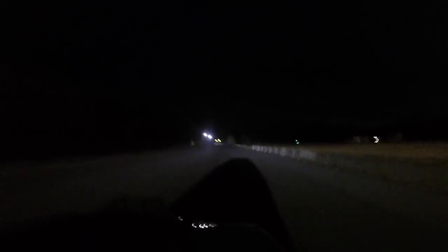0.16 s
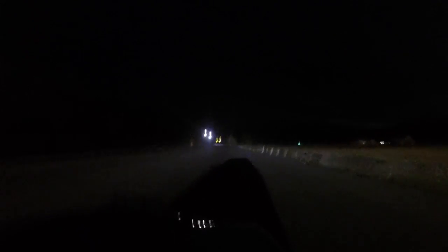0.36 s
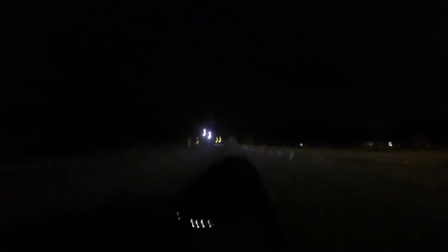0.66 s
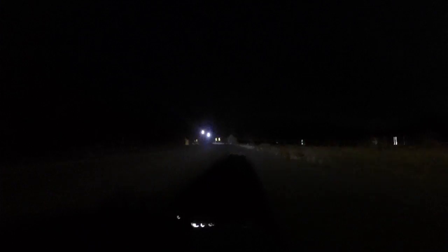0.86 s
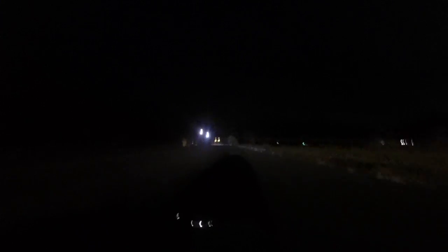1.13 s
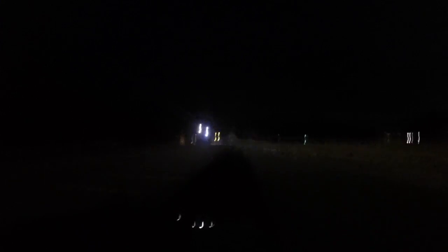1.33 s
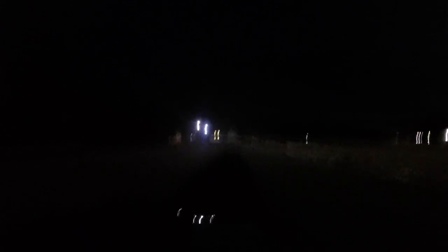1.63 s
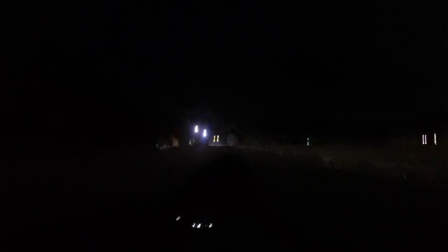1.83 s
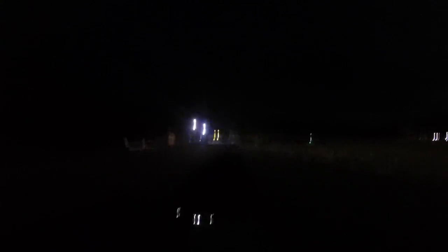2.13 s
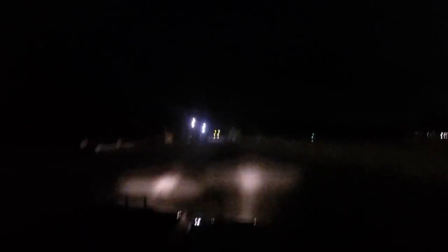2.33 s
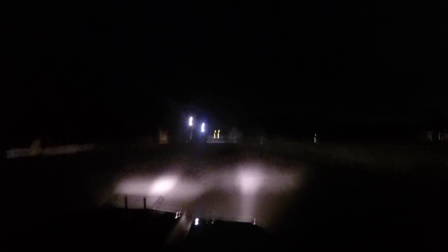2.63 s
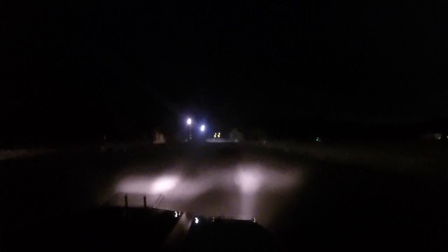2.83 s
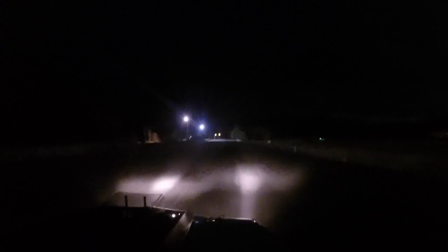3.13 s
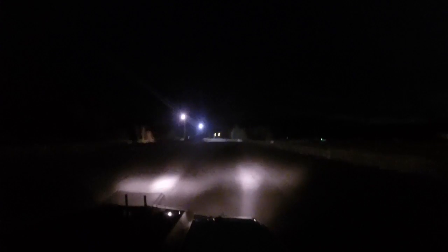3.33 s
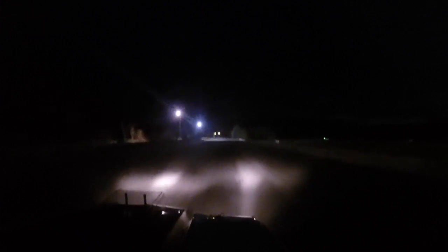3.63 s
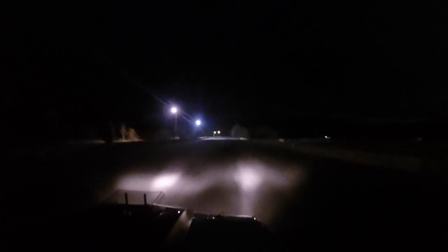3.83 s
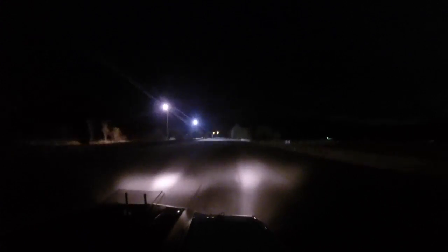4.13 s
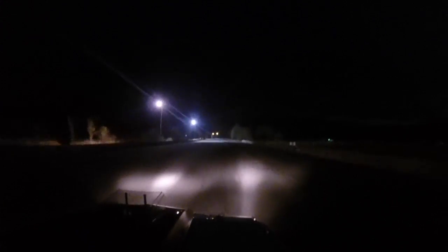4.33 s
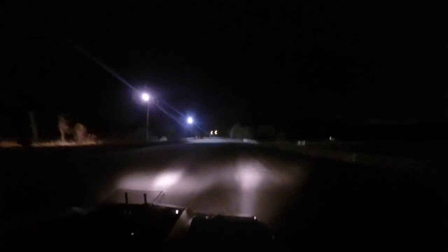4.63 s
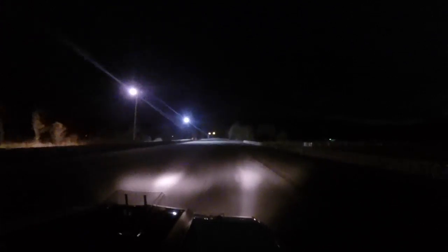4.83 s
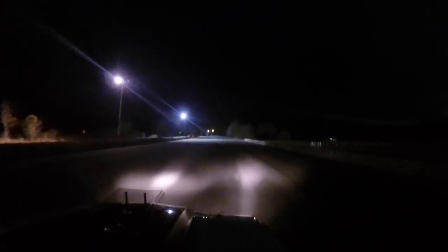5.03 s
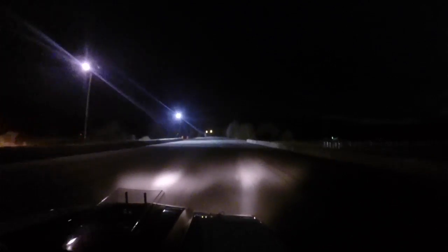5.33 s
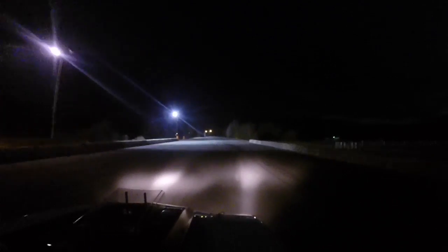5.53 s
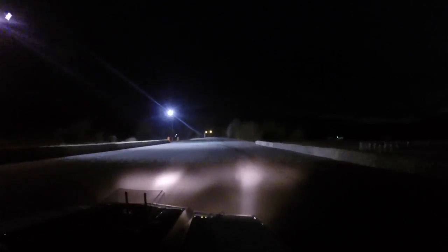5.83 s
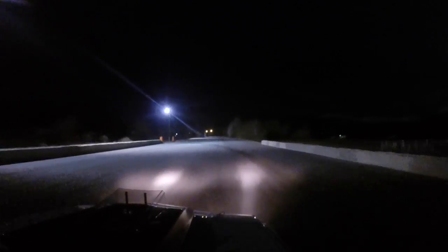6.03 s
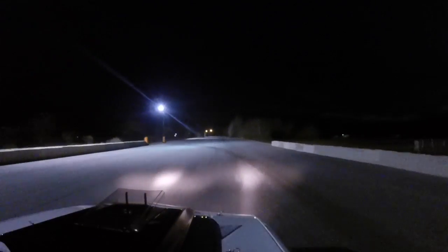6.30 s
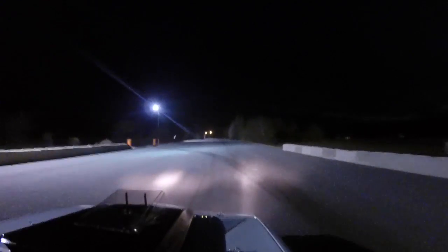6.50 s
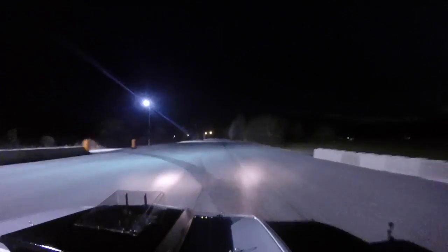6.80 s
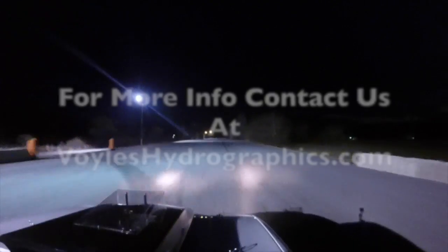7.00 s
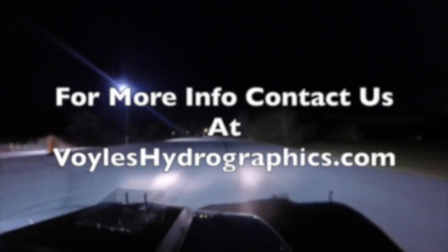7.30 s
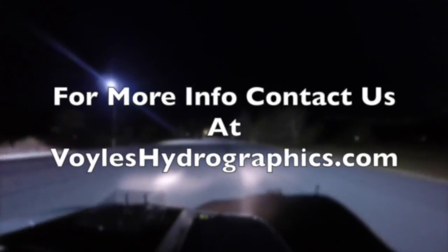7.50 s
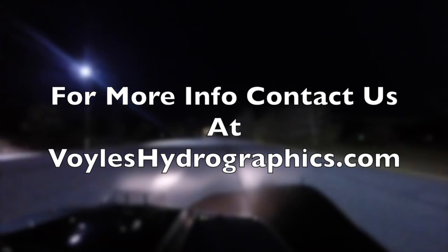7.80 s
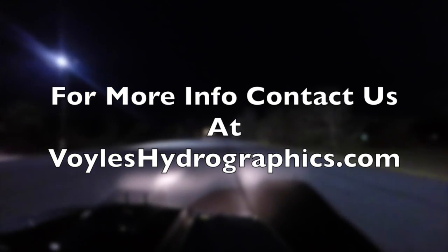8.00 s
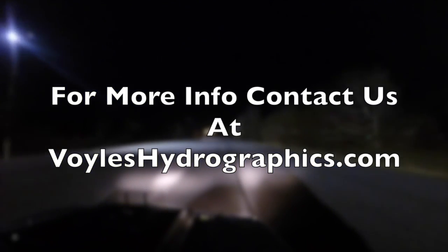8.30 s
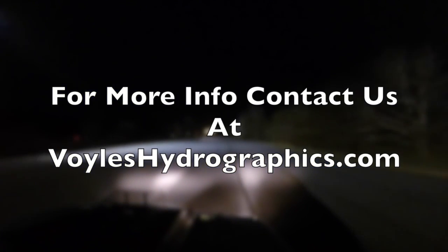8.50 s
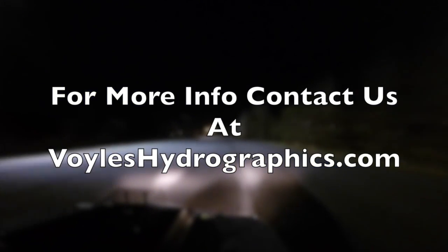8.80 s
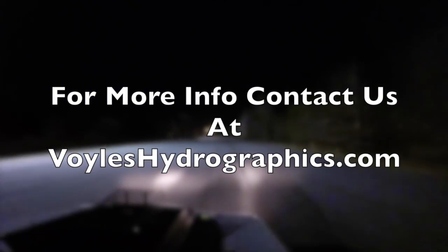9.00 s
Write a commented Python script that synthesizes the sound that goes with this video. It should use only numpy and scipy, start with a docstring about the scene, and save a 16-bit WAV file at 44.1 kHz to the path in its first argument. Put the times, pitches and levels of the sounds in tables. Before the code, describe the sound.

Bright, gritty wind noise pours over an onboard microphone while a race car slows on a track. The hiss thins out, leaving a duller rush and a stronger, wavering low boom from road and exhaust. Tyre tones slide downward through a ringing panel. A sharp stone tick lands early; short bass thuds cluster in the last two seconds, briefly squashing the sound.

```python
"""A booming roar and a bright rush of air: a drag car coasts down the track after its run.
We listen from a camera riding on the car. The engine lopes near idle and booms in the body,
and the tyres drum at multiples of the falling wheel speed.
Air is filtered noise shaped by the camera housing, grit ticks on it and a faint whistle sits on top.
Bumps add short deep swings, and the camera's compressor turns loud bass peaks down."""
import sys
import numpy as np
from scipy import signal
from scipy.fft import rfft, irfft, next_fast_len
from scipy.io import wavfile
from scipy.ndimage import uniform_filter1d

SR = 44100
rng = np.random.default_rng(int(sys.argv[2]) if len(sys.argv) > 2 else 0)


def unload_wav(signal):
    """Save mono or channel-first audio to the path in sys.argv[1] as 16-bit WAV at rate SR, clipped to [-1, 1]."""
    wavfile.write(
        sys.argv[1],
        SR,
        np.round(np.clip(np.atleast_2d(signal).T, -1, 1) * 32767).astype(np.int16),
    )


N = 403503
TIME = np.arange(N) / SR  # seconds
FREQS = np.fft.rfftfreq(N, 1 / SR)  # Hz

# how fast the wheels turn as the car slows: (time_s, turns_per_s)
WHEEL_SPEED = [(0, 21.3), (1, 19.46), (2, 17.62), (3, 16.13), (4, 14.74), (5, 13.58), (6, 12.6), (7, 11.68),
               (8, 10.96), (9.15, 10.15)]


def gain_of(db):
    """Turns decibels into an amplitude."""
    return 10 ** (np.asarray(db) / 20)


def evened(x):
    """Scales a sound to an average (rms) level of 1."""
    return x / np.sqrt(np.mean(x ** 2) + 1e-20)


def steadied(x, size):
    """Keeps the level near 1 all along, judged over stretches of about `size` samples."""
    power = uniform_filter1d(uniform_filter1d(x ** 2, size), size)
    return x / np.sqrt(abs(power) + 1e-12)


def curves(rows):
    """Joins the rows of a table by straight lines into one curve over time for each column."""
    times_s, *columns = np.transpose(rows)
    return [np.interp(TIME, times_s, column) for column in columns]


def read(points, hz):
    """Reads the gain at any pitch from (pitch_hz, level_db) points, on a log pitch scale."""
    point_hz, point_db = np.transpose(points)
    return gain_of(np.interp(np.log(hz + 1), np.log(point_hz + 1), point_db))


def coloured(x, gain):
    """Filters a sound, with one gain for each frequency in FREQS."""
    size = next_fast_len(N)
    size_gain = np.interp(np.fft.rfftfreq(size, 1 / SR), FREQS, gain)
    return irfft(rfft(x, size) * size_gain, size)[:N]


def wander(per_s):
    """Makes a random curve of rms 1 that picks a new value `per_s` times a second."""
    knots = rng.standard_normal(8192)
    return evened(np.interp(TIME * per_s, np.arange(len(knots)), knots))


def hump(s, length):
    """Rises and falls smoothly to height 1 at time s; about a third is left half a length away."""
    return np.exp(-(2 * (TIME - s) / length) ** 2)


def partial(turns, rough, waver_per_s):
    """Makes one tone that wavers at random in phase and strength."""
    angle = 2 * np.pi * (turns + rng.random())
    tone = np.cos(angle + rough * wander(waver_per_s))
    return tone * (1 + rough * wander(waver_per_s))


def body():
    """Road and exhaust shake the body, which answers with a deep boom, a drone and a ringing panel."""
    # what the body passes into the deep boom: (pitch_hz, level_db)
    boom_shape = [(8, -45), (14, -18), (19, -12), (28, -19), (41, -4.5), (53, -8.5), (63, 4.5), (72, 2.5),
                  (82, -6), (92, -8.5), (105, -14), (125, -18.5), (170, -34.5), (260, -52.5)]
    # what it passes into the drone above: (pitch_hz, level_db)
    drone_shape = [(105, -25), (135, -16), (155, -2.5), (175, -5), (188, -8), (208, -3), (235, -5),
                   (278, 2), (315, -5.5), (350, -24.5), (440, -51)]
    # a panel that rings above the drone: (pitch_hz, level_db)
    panel_shape = [(260, -41), (320, -10), (350, 3), (385, -2.5), (405, -6.5), (428, -4.5), (450, -21.5),
                   (475, -31), (560, -55)]
    # level of the panel, which swells as tread tones glide through it: (time_s, level_db)
    panel_levels = [(0, -37.5), (.18, -43), (.35, -32.5), (.8, -43), (1.2, -41.5), (2.9, -29), (3.6, -33.5),
                    (4.25, -28), (4.95, -34.5), (5.9, -27), (6.35, -30.5), (6.8, -36.5), (7.35, -27.5),
                    (7.85, -33), (9.15, -29.5)]
    # smoother stretches where the boom sinks: (middle_s, length_s, drop_db)
    lulls = [(.6, 0.11, 3), (.92, 0.35, 3.5), (8.83, 0.26, 6)]

    road = tyres()
    road_boom = gain_of(-19.0) * evened(coloured(road, read(boom_shape, FREQS)))
    boom = road_boom + exhaust()
    drone = coloured(road, read(drone_shape, FREQS))
    panel = coloured(road, read(panel_shape, FREQS))

    # the boom grows steadily as the car rolls on, and throbs at random
    throb_db = 1.53 * uniform_filter1d(wander(24), size=1500)
    lull_db = sum(drop_db * hump(s, length) for s, length, drop_db in lulls)
    start_db, growth_db_per_s = -19.5, 0.76
    boom_db = start_db + growth_db_per_s * TIME - lull_db + throb_db

    # the drone is loudest midway and falls off to either side
    top_db, top_s, fall_db_per_s = -29, 4.3, 1.1
    drone_db = top_db - fall_db_per_s * abs(TIME - top_s)
    panel_db = curves(panel_levels)[0]
    return (gain_of(boom_db) * steadied(boom, size=5000)
            + gain_of(drone_db) * steadied(drone, size=16000)
            + gain_of(panel_db) * steadied(panel, size=16000))


def exhaust():
    """Uneven cylinder firings give low tones close in pitch, which beat together into a lope."""
    # engine speed, and exhaust level as it joins the road boom: (time_s, camshaft_turns_per_s, level_db)
    engine = [(0, 8.9, -20.5), (.5, 10.7, -22), (1.2, 9.7, -28), (2, 10.2, -24), (2.8, 11.1, -24.5),
              (3.8, 11.3, -16.5), (5, 11.25, -14.5), (6.2, 11.74, -16.5), (7.2, 11.3, -11),
              (8.2, 10.9, -18), (8.55, 10.34, -7), (9.15, 11.3, -12)]
    # eight firings a camshaft turn, uneven between cylinders: (multiple_of_turns, level_db)
    firing_tones = [(4, -17), (6, -3), (7, 2.5), (8, -0.5), (11, -16.5), (12, -19), (13, -22.5),
                    (25, -15.5), (27, -19)]

    cam_hz, level_db = curves(engine)
    unsteady_hz = cam_hz * (1 + 0.0069 * wander(5))
    turns = np.cumsum(unsteady_hz) / SR
    lope = sum(gain_of(db) * partial(round(multiple) * turns, rough=0.39, waver_per_s=9)
               for multiple, db in firing_tones)
    return gain_of(level_db) * evened(lope)


def tyres():
    """The tread repeats with every wheel turn, giving tones at its multiples; rough track adds noise."""
    # strongest tones, from unbalance and uneven tread: (multiple_of_turns, level_db)
    strong_tones = [(1, 15.5), (2, 2), (3, 3), (4, 4.5), (10, 12), (15, 8.5), (16, 8), (17, 6.5), (19, 6),
                    (20, 8.5), (21, 8), (22, 11), (24, 7), (26, 10.5), (28, 12), (29, 5), (30, 14),
                    (31, 11), (34, 9.5), (36, 11)]

    turns = np.cumsum(curves(WHEEL_SPEED)[0]) / SR
    strong = {round(multiple): db for multiple, db in strong_tones}
    # multiples missing from the table play at -6 dB
    tread = sum(gain_of(strong.get(k, -6)) * partial(k * turns, rough=.16, waver_per_s=3)
                for k in range(1, 39))
    track = evened(coloured(rng.standard_normal(N), FREQS < 1000))
    return evened(tread) + gain_of(0.5) * track


def bumps():
    """Each bump in the track swings the body for a few cycles at the pitch of its boom."""
    # (top_s, length_s, peak_db)
    bump_list = [(.1, 0.29, -9), (.32, .1, -15), (.72, 0.096, -8.5), (1.08, 0.059, -12), (1.88, 0.054, -11),
                 (4.42, .06, -10), (7.45, 0.082, -12), (7.815, 0.054, -2), (8.262, .04, 4), (8.59, .06, 2)]
    boom_hz = 68

    size = sum(gain_of(db) * hump(s, length) for s, length, db in bump_list)
    return size * np.sin(2 * np.pi * (boom_hz * TIME + rng.random()))


def air():
    """Fluttering air and fine spray excite the housing: a hiss that fades and a rush that fades less."""
    hiss_db, rush_db = air_levels()
    housing = housing_gain()
    # the part of each pitch that goes to the hiss: (pitch_hz, level_db)
    hiss_points = [(1200, -15), (2000, -9.0), (2600, -1.5), (4000, -1.0), (6200, -0.5),
                   (8000, -8.5), (10500, -9.0), (14000, -6)]
    hiss_share = read(hiss_points, FREQS).clip(0, 1)
    rush_share = np.sqrt(1 - hiss_share ** 2)  # the rest of the power

    flutter = gain_of(0.68 * wander(35) + 1.0 * wander(350))
    # about 900 random clicks a second
    spray = evened((rng.random(N) < 900 / SR) * rng.standard_normal(N))
    hiss_source = flutter * (rng.standard_normal(N) + 0.25 * spray)
    rush_source = flutter * (rng.standard_normal(N) + 0.19 * spray)
    hiss = coloured(hiss_source, housing * hiss_share)
    rush = coloured(rush_source, housing * rush_share)
    return gain_of(hiss_db) * evened(hiss) + gain_of(rush_db) * evened(rush)


def air_levels():
    """Gives the hiss and rush levels in dB: both sink with the car's speed and share dips and swells."""
    # brief dips and swells of the hiss and rush: (time_s, change_db)
    dips_and_swells = [(0, 0), (.16, -3.5), (.3, 0.7), (.65, 2.3), (.77, -1.5), (1.03, 2.8), (1.15, -0.6),
                       (1.8, .5), (1.95, -2.1), (2.9, 1.75), (3.75, 0.15), (4.3, 2.4), (5.6, 1), (6.3, 0.3),
                       (7.3, 1.5), (8.2, 0.5), (8.4, -0.9), (9.15, 3)]

    speed = curves(WHEEL_SPEED)[0]
    halvings = np.log2(speed[0] / speed)  # how many times the speed has halved
    flicker_db = 0.91 * wander(14)
    change_db = curves(dips_and_swells)[0] + flicker_db
    # level at the opening speed, less a fall in dB for each halving
    hiss_db = -19 - 8 * halvings + change_db
    rush_db = -25.5 - 1.75 * halvings + change_db
    return hiss_db, rush_db


def housing_gain():
    """The camera housing favours certain pitches: steep-sided resonances, added in power."""
    # (pitch_hz, width_hz, level_db)
    resonances = [(463, 110, -18.5), (784, 310, -16.0), (1544, 93, -8.0), (1745, 514, -8.0),
                  (2530, 329, -0.4), (2804, 205, -0.5), (3107, 216, -2.5), (3578, 220, -7.5),
                  (3887, 320, -11.0), (4337, 470, -15.5), (5160, 350, -19.5), (5954, 383, -9.5),
                  (6340, 320, -16.5), (7080, 590, -22.5), (8140, 1000, -28.5), (9410, 850, -29.2),
                  (10340, 990, -27.0), (11900, 1200, -33.0), (13240, 640, -32.0), (14440, 2460, -41.0)]

    power = sum(gain_of(db) ** 2 / (1 + ((FREQS - hz) / width) ** 2) ** 3
                for hz, width, db in resonances)
    return np.sqrt(power)


def grit():
    """Small stones tick on two strong modes of the housing, which swing against each other."""
    # hits, with the level before each mode's share below: (time_s, level_db)
    hits = [(.081, -14), (.3655, -5), (.789, 0.5), (.7905, -22), (1.407, -18), (3.819, -8), (4.1, -22),
            (6.213, -19), (7.301, -17)]

    low_mode = strikes(hits, hz=1690, decay_s=0.0019)
    high_mode = strikes(hits, hz=2650, decay_s=0.00092)
    return 0.46 * low_mode - 0.57 * high_mode


def strikes(rows, hz, decay_s):
    """Each blow starts one swing that dies away."""
    out = np.zeros(N)
    t = np.arange(SR // 4) / SR
    ring = -np.sin(2 * np.pi * hz * t) * np.exp(-t / decay_s)
    for s, db in rows:
        part = out[round(s * SR):][:len(t)]
        part += gain_of(db) * ring[:len(part)]  # adds into out
    return out


def whistle():
    """A faint, high tone made fuzzy by fast random changes of strength and phase."""
    # (time_s, pitch_hz, level_db)
    whistle_path = [(0, 10500, -68), (1.5, 10500, -56), (2.6, 10450, -66), (4.8, 10650, -61),
                    (5.5, 10630, -50), (6.2, 10450, -52), (7, 10350, -56), (7.8, 10350, -68)]

    hz, level_db = curves(whistle_path)
    tone = partial(np.cumsum(hz) / SR, rough=0.51, waver_per_s=47)
    return gain_of(level_db) * evened(wander(170) * tone)


def scene():
    """Adds every source together at the one microphone."""
    return (body() + air() + whistle() + grit() + bumps())[None]


def record(dry):
    """A compressor ducks quickly on bass peaks and recovers more slowly; then the top is cut off."""
    threshold_db, ratio, recovery_db_per_s, makeup_db = -8.5, 2.6, 54, 0.18
    edge_hz = 15250  # little is left above this pitch

    bass = uniform_filter1d(dry[0], size=90)  # a short average leaves mostly bass
    peak_db = 20 * np.log10(abs(bass) + 1e-9)
    # hold each peak, letting it sink at the recovery speed
    fall_db = TIME * recovery_db_per_s
    held_db = np.maximum.accumulate(peak_db + fall_db) - fall_db
    over_db = np.maximum(held_db - threshold_db, 0)
    duck_db = (1 - 1 / ratio) * uniform_filter1d(over_db, size=120)
    ducked = dry * gain_of(makeup_db - duck_db)

    low_pass = signal.firwin(701, edge_hz, window=("kaiser", 9), fs=SR)
    return signal.oaconvolve(ducked, low_pass[None], "same")


dry = scene()
out = record(dry)
unload_wav(out)
```